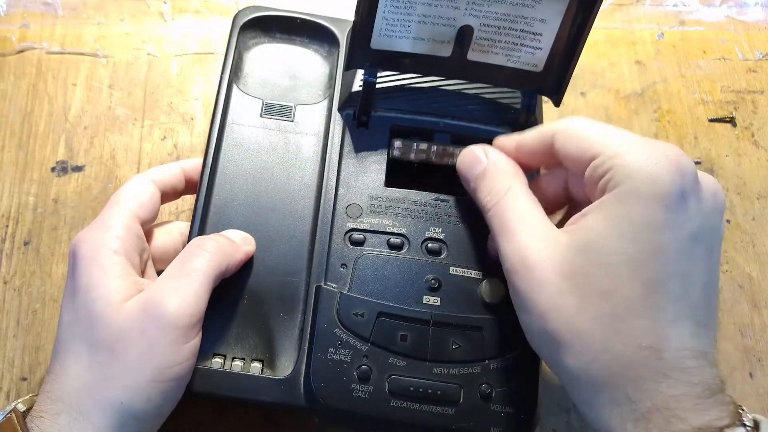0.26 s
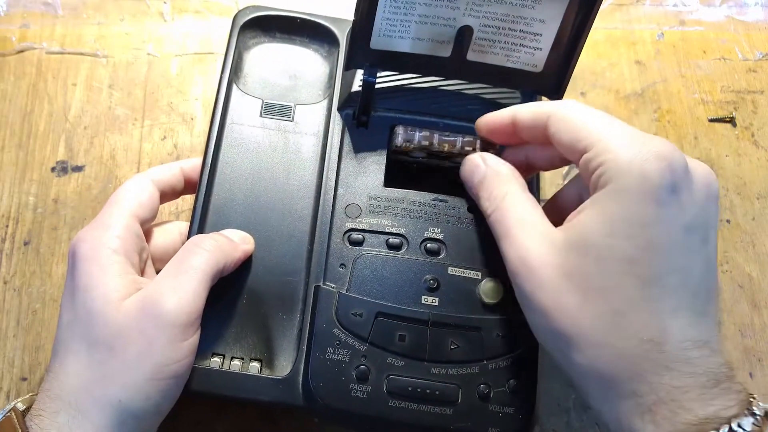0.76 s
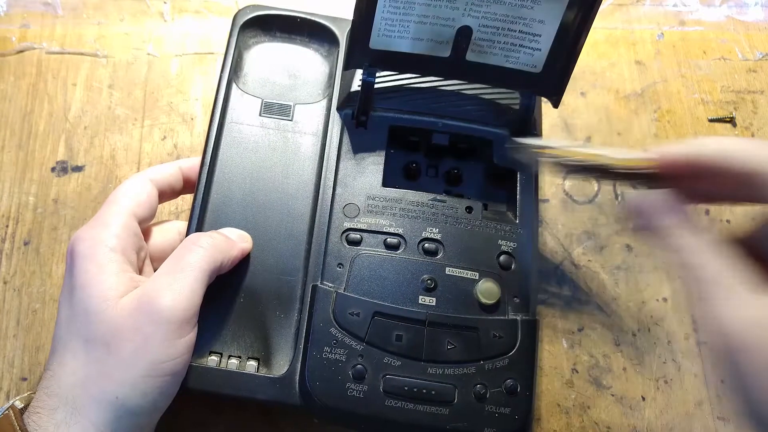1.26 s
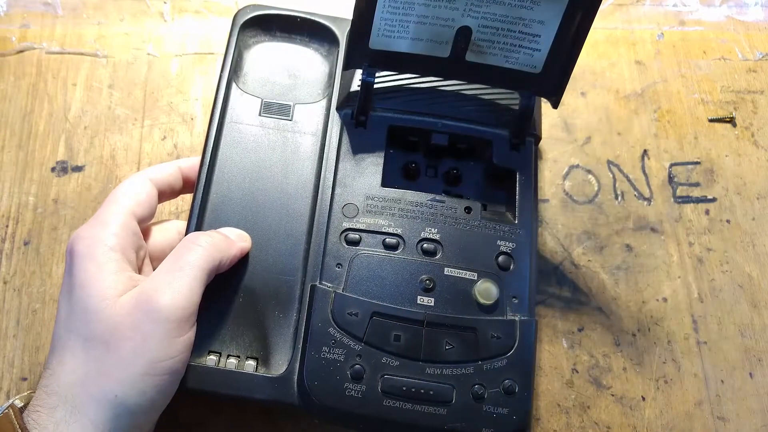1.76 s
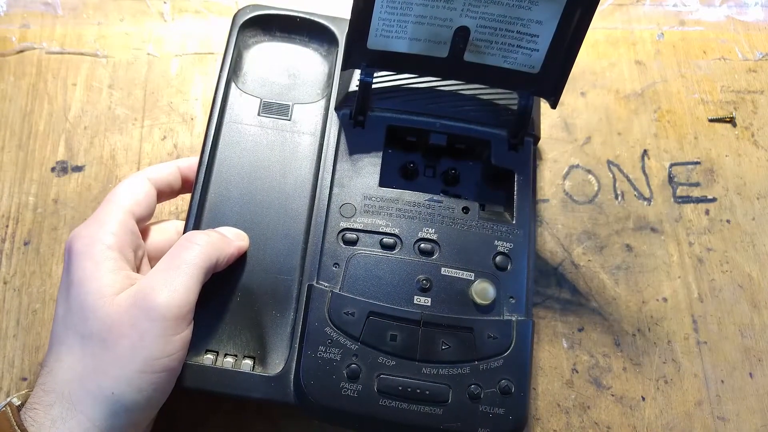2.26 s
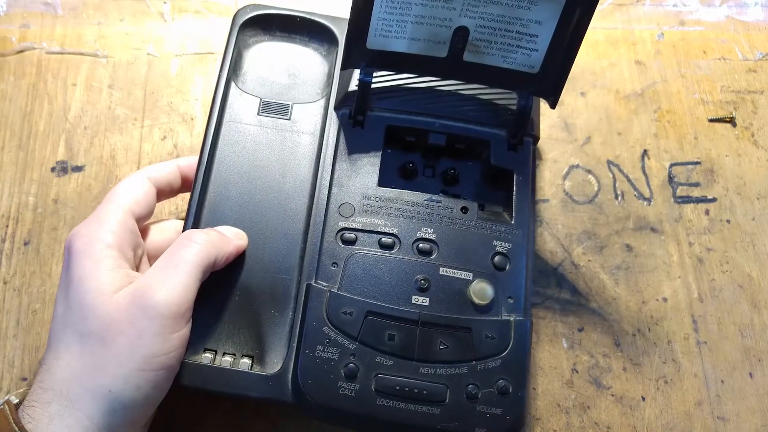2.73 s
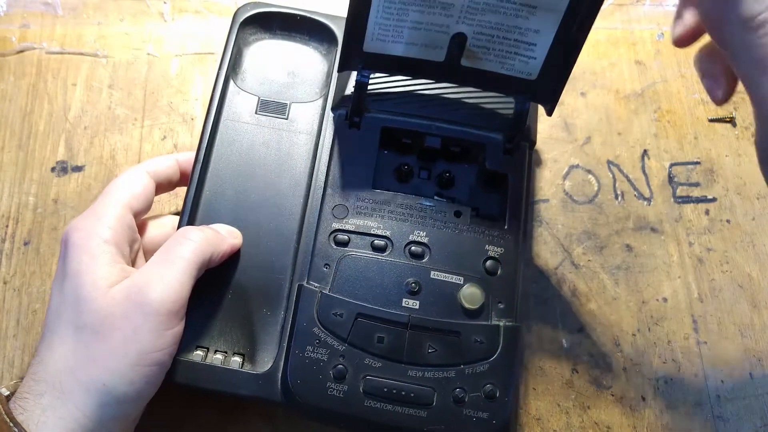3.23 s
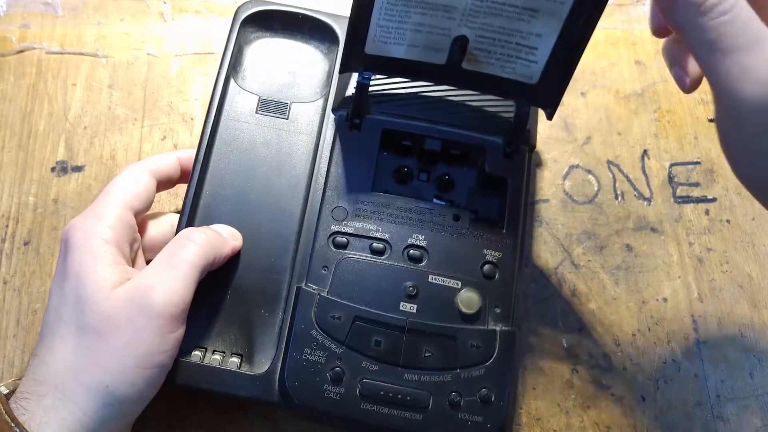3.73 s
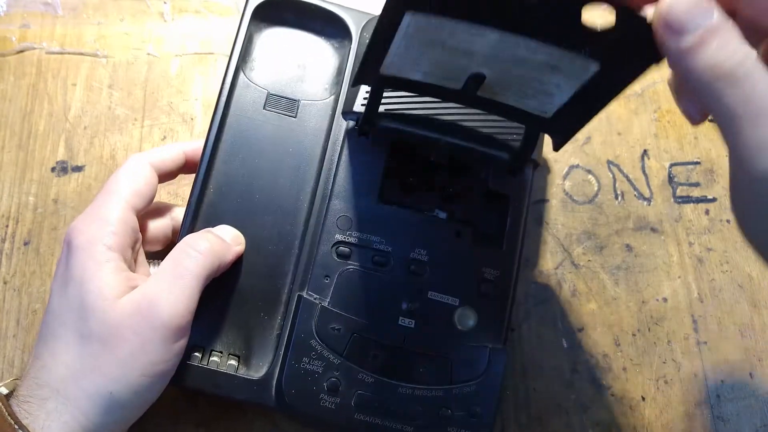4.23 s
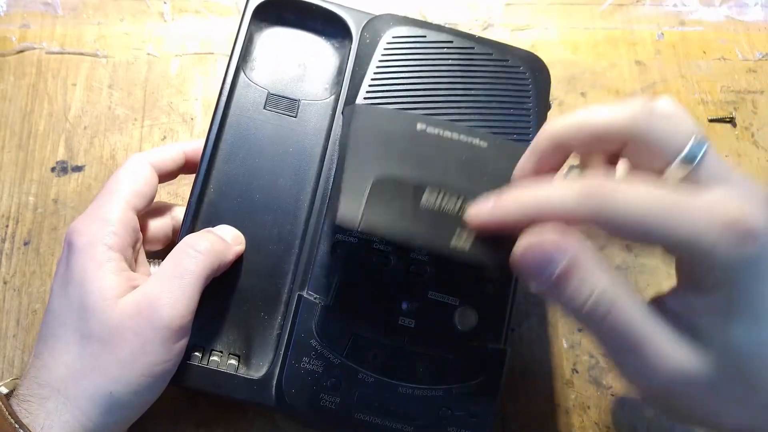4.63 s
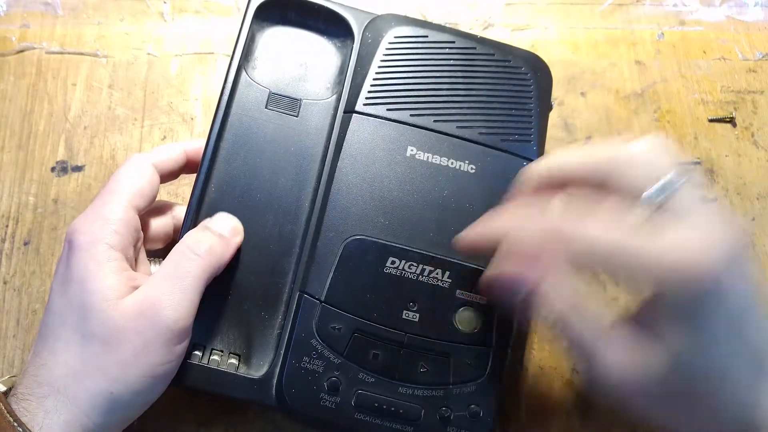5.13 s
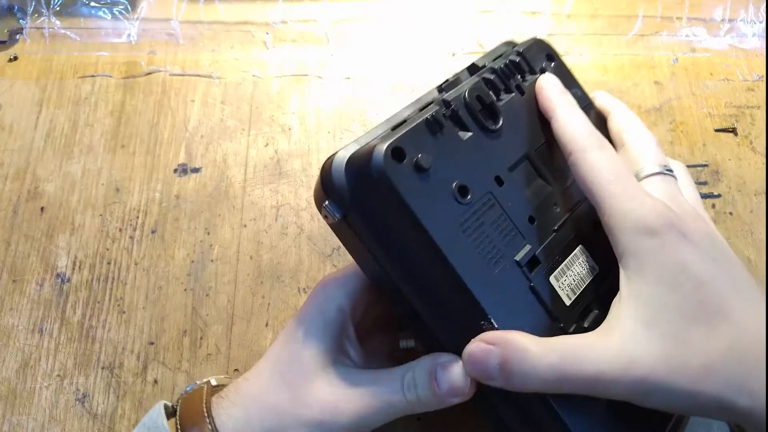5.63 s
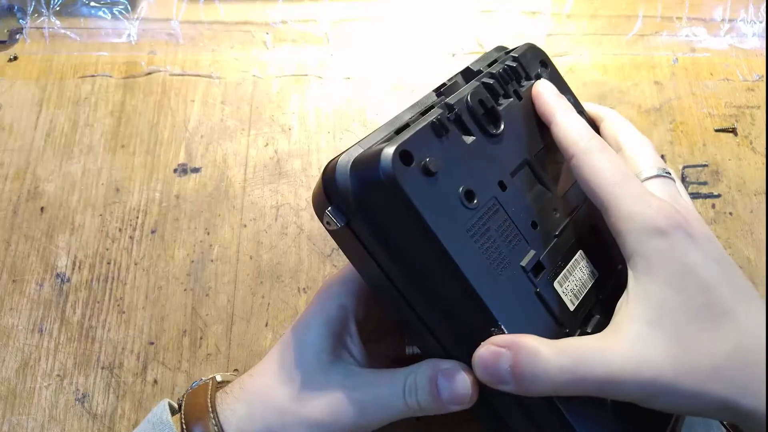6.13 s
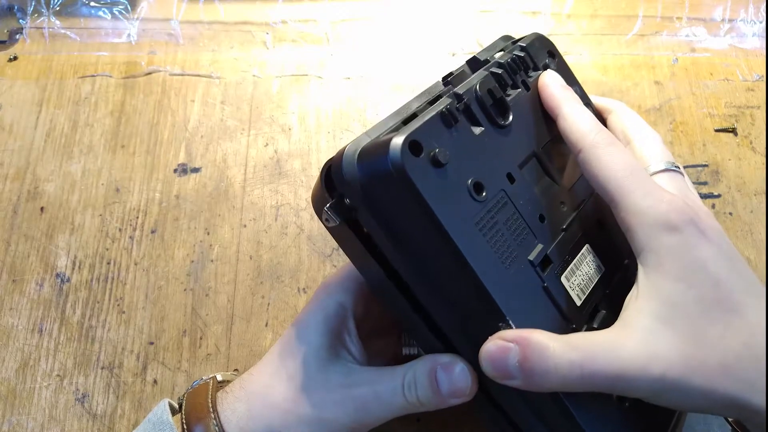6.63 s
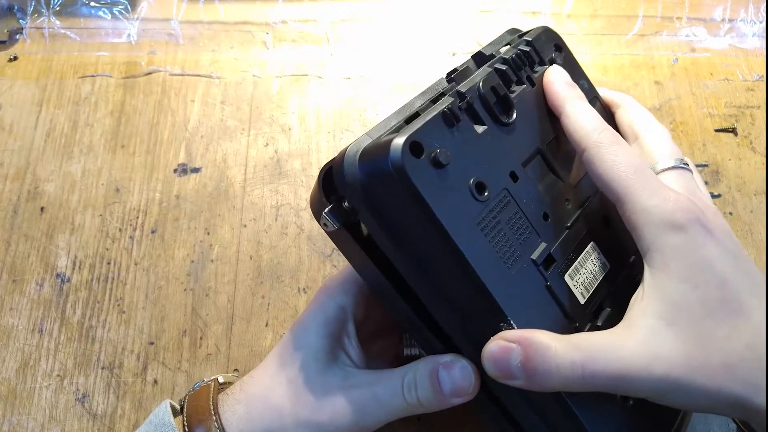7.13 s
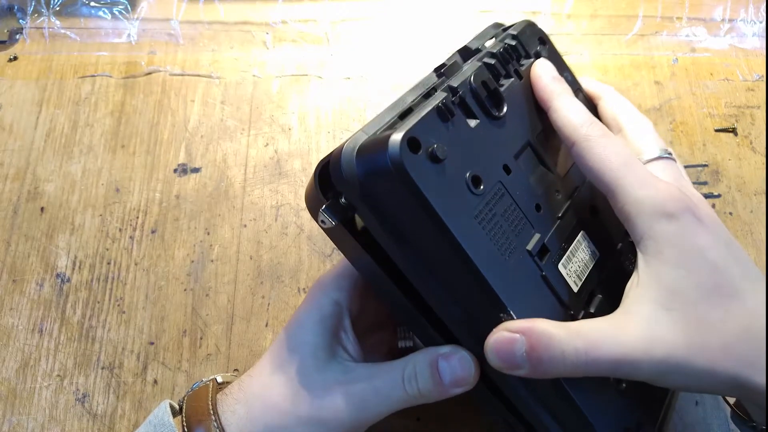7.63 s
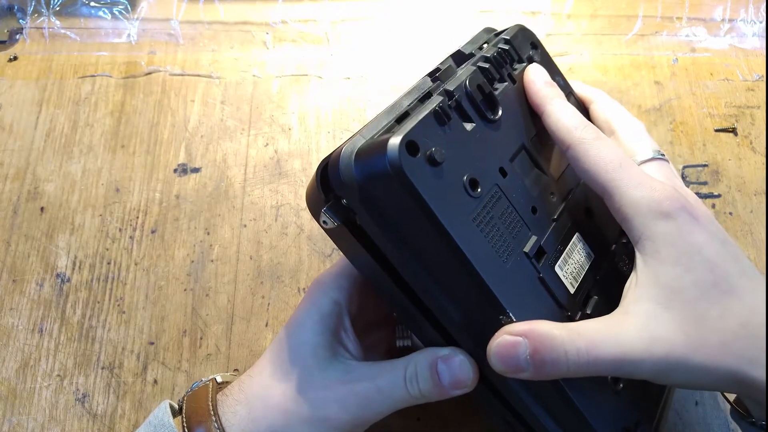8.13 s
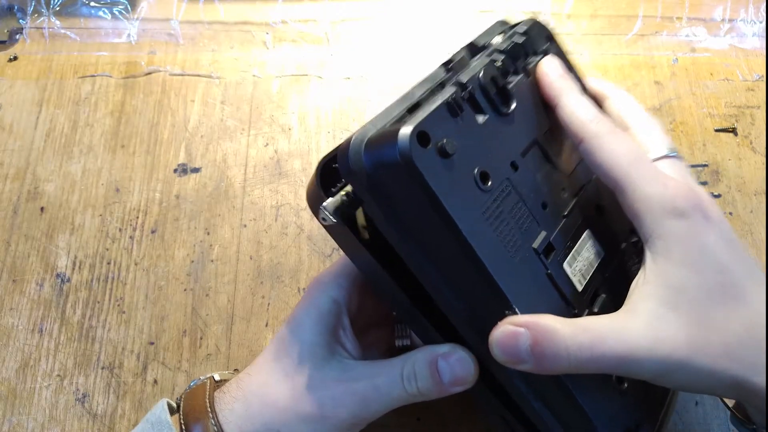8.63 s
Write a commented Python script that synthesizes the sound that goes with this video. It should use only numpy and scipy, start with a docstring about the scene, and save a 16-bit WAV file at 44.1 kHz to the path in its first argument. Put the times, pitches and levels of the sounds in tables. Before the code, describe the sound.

Close plastic clicks and taps as a small cassette snaps out, a hinged lid claps shut, and a hollow case is prised apart.

```python
"""A plastic answering machine is handled on a wooden workbench in a small room, close to the microphone.
First fingers rub and tap the case, and a small cassette is pulled out and put aside with a hissing slide and a snap.
Then the lid comes free, drones on its hinges and snaps shut; last the case is tipped up and prised apart, creaking.
Contacts are filtered noise bursts over damped modes of shell and bench; rubbing is noise that sticks and slips.
Faint steady noise lies under it all, the room adds a tail, and the loudest peaks saturate."""
import sys
import numpy as np
from scipy import signal
from scipy.fft import rfft, irfft
from scipy.io import wavfile

SR = 44100
rng = np.random.default_rng(int(sys.argv[2]) if len(sys.argv) > 2 else 0)


def dump_mix(stems):
    """Bounce the given channels to the path in sys.argv[1] as a 16-bit WAV at rate SR."""
    frames = np.atleast_2d(stems).T  # one column per channel
    limited = np.clip(frames, -1, 1)  # hard clip at full scale
    pcm = np.round(limited * 32767).astype(np.int16)
    wavfile.write(sys.argv[1], SR, pcm)


N = 391166  # length in samples

# Colour of the room's steady noise. Each row: frequency in Hz, relative level in dB.
QUIET = [(20, -12.5), (52, 1.5), (100, -4), (220, -13.5), (1000, -24.5), (4000, -27.5), (7000, -23.5),
         (10000, -27), (15500, -28)]
QUIET_DB = -68.5
# The room's tail. Each row: band centre in Hz, t60 in seconds, level in dB.
ROOM = [(125, 0.95, -9.5), (320, 0.33, -4), (896, 0.1, -12), (2200, 0.29, -6.5), (5445, 0.33, -12),
        (12000, 0.28, -12)]
# Treble difference of the two microphone ports. Each row: frequency in Hz, left minus right in dB.
PORTS = [(100, 0), (600, 0.5), (1200, -2), (2200, 0), (3500, 0), (6800, -4.5), (8500, 1.5), (10500, 5.5),
         (15000, 2)]
TOP_HZ = 16000  # nothing much is heard above this

# Modes of the bench top, detuned a little at each blow. Each row: frequency in Hz, level in dB, t60 in seconds.
BENCH = [(62, -11, 0.3), (87.5, -4, .25), (105.36, 0.5, 0.46), (148, -0.5, 0.17), (178, -6, 0.06),
         (229, -6, 0.1)]
# Modes of the hollow shell, detuned a little at each blow.
# Each row: frequency in Hz, level in dB, t60 in seconds.
SHELL = [(265, -3.5, 0.04), (350, -1, 0.033), (363, -8.5, 0.088), (471.3, -6.5, 0.06), (512, -3.5, 0.091),
         (560, -7.5, 0.022), (610, -5, 0.032), (656, 0.5, 0.075), (704, -8.5, 0.036), (873, -4.5, 0.037),
         (1010, -5, 0.027), (1109, -5.5, 0.087), (1310, -10, 0.04)]
# Modes of the small catch where the cassette goes. Each row: frequency in Hz, level in dB, t60 in seconds.
CATCH = [(185, 5, 0.14), (238.9, 2, 0.044), (484, -1, .07), (745, 5, 0.058), (810, 0, 0.026)]
# Modes of the closed lid. Each row: frequency in Hz, level in dB, t60 in seconds.
LID = [(203, -16.5, 0.092), (362, -14, 0.083), (399, -13, 0.13), (495, -7, 0.096), (540, -3.5, 0.027),
       (565, -1, 0.09), (648, -6, .07), (1026, -5, 0.08), (1215, -12, 0.076)]
# Modes of the loose parts. Each row: frequency in Hz, level in dB, t60 in seconds.
RATTLE = [(5768, -8, 0.05), (6383, -3.5, 0.06), (6645, -2, 0.06), (7000, -1, 0.06), (7100, 1, 0.057),
          (7200, 0, 0.08), (7356, -1, 0.07), (7600, -5.5, 0.05), (7850, -4, 0.05), (8744, -8.5, 0.05),
          (9900, -8, 0.04)]
BODY_LOW_HZ = 170  # below this the plastic bodies radiate little

# Resonances of the case's thin plastic walls. Each row: frequency in Hz, width in Hz, boost in dB.
WALLS = [(1033, 45, 2), (1190, 120, 2.5), (1670, 78, 2.5), (2070, 62, 2.5), (2490, 46, 5.5),
         (2630, 30, 3.5), (3110, 37, 4.5), (3500, 340, 2.5), (4650, 5.2, 9), (5500, 50, 5), (6240, 98, 5.5),
         (6650, 120, 3), (6840, 86, 6.5), (7400, 99, 0.5), (7450, 190, 4.5), (8110, 180, 8),
         (8910, 120, 4.5), (9800, 190, 6), (12800, 250, 4.5)]
# Wall resonances of the small catch. Each row: frequency in Hz, width in Hz, boost in dB.
CATCH_WALLS = [(2400, 60, 4), (3254, 70, 7), (5250, 70, 8), (6460, 55, 4.7), (6570, 60, 7), (6853, 90, 3.4),
               (7050, 45, 8), (6910, 50, 6.8), (7210, 55, 9), (7635, 70, 5.6), (8630, 200, 11),
               (9605, 150, 7), (10100, 140, 6.3)]
# Wall resonances of the lid. Each row: frequency in Hz, width in Hz, boost in dB.
LID_WALLS = [(1045, 50, 3.6), (2140, 120, 4), (2397, 50, 8), (4406, 40, 3.4), (5990, 60, 7), (6580, 70, 8),
             (7130, 45, 5), (7920, 69, 10), (8240, 110, 13), (12200, 250, 14)]

# Clack of the case, its dense wall modes. Each row: frequency in Hz, relative level in dB.
CLACK = [(500, -19), (850, 1.5), (1100, 0.5), (1400, -1), (1800, -0.5), (2400, -2), (3200, -5.5),
         (4400, -5.5), (6000, -12.5)]
# Clack of the small catch, higher than the case. Each row: frequency in Hz, relative level in dB.
CATCH_CLACK = [(500, -14), (850, -3.5), (1300, -11.5), (2000, -3.5), (2800, -5), (3600, 1.5), (4800, -1),
               (6500, -13)]
# Clack of the shut lid, lower and hollower than the case. Each row: frequency in Hz, relative level in dB.
LID_CLACK = [(450, -12.5), (800, -2.5), (1030, 3), (1300, -4.5), (1800, -2.5), (2400, -4.5), (3200, -4),
             (4400, -2), (6000, -12)]
# Dull knock of a soft bump. Each row: frequency in Hz, relative level in dB.
KNOCK = [(380, -10.5), (600, 1), (900, 0.5), (1300, -3.5), (2000, -10), (3000, -19), (6000, -29)]
# Tick of a sharp edge contact. Each row: frequency in Hz, relative level in dB.
TICK = [(3000, -34), (4600, -11.5), (5800, -3), (6500, -2.5), (7200, 1.5), (8200, -7.5), (9500, -10),
        (12000, -17), (15500, -20.5)]
# Tick of the small catch. Each row: frequency in Hz, relative level in dB.
CATCH_TICK = [(3000, -30.5), (4800, -12.5), (6000, -5), (6900, 0.5), (7700, -3.5), (8600, -6.5),
              (9200, -11.5), (10300, -12), (12000, -20), (15500, -22.5)]

# Friction colour of rumble in the bench. Each row: frequency in Hz, relative level in dB.
RUMBLE = [(25, -14), (60, 2.5), (100, 6.5), (150, -0.5), (250, -8.5), (400, -23.5), (700, -38)]
# Friction colour of a dull rub on the shell. Each row: frequency in Hz, relative level in dB.
RUB = [(200, -16), (350, -3.5), (520, -1), (660, -1.5), (850, -5), (1200, -7.5), (2000, -21), (4000, -39.5)]
# Friction colour of a dry scrape. Each row: frequency in Hz, relative level in dB.
SCRAPE = [(700, -19), (1500, -4), (2300, -2.5), (4000, -5), (5500, -3.5), (7000, 4), (8500, -8),
          (11000, -15), (15500, -15.5)]
# Friction colour of a smooth hiss. Each row: frequency in Hz, relative level in dB.
HISS = [(700, -24.5), (1800, -11.5), (3000, -16), (5000, -11), (7000, -1), (9000, -8.5), (12000, -11),
        (15500, -15.5)]
# Friction colour of the hinges' drone in the shell. Each row: frequency in Hz, relative level in dB.
DRONE = [(300, -24), (560, -6), (630, 7), (690, 5), (770, -16), (1100, -19), (2000, -34)]
# Friction colour of soft rustling. Each row: frequency in Hz, relative level in dB.
RUSTLE = [(300, -14), (480, 2.5), (650, -4), (880, 4), (1300, -6.5), (1900, -16.5), (4000, -17)]

# The bench rumbles under shifting hands, and thumps as the lid comes free.
# Each row: start in seconds, length in seconds, level in dB.
BENCH_RUMBLES = [(0.0, 0.098, -55), (0.422, 0.36, -62.5), (0.616, 0.086, -58), (1.03, 0.32, -68.5),
                 (2.867, 0.37, -56.5), (3.186, 0.68, -55.5), (3.556, 0.27, -61), (3.989, 0.075, -43.5),
                 (5.049, 0.36, -52), (5.322, 0.26, -63), (5.863, 0.089, -67), (6.109, 0.14, -52.5),
                 (6.585, 0.22, -52.5), (8.243, 0.59, -71.5), (8.58, 0.24, -66)]
BENCH_RUMBLE_ATTACK_S = 0.0046
# Soft rustles. Each row: start in seconds, length in seconds, level in dB.
RUSTLES = [(0.5, 0.15, -59), (0.65, 0.11, -67.5), (0.76, 0.19, -71), (7.2, 0.23, -79), (7.44, 0.13, -72),
           (7.63, 0.059, -67.5), (7.75, 0.13, -67), (7.92, 0.07, -71)]
# Short strokes of a finger or an edge over the plastic.
# Each row: start in seconds, length in seconds, dry scrape in dB, shell rub in dB.
SCUFFS = [(0.0, 0.078, -50, -58), (0.149, 0.13, -61, -70), (0.427, 0.12, -57, -57), (0.953, 0.17, -49, -67),
          (2.377, 0.083, -45.5, -53.5), (2.486, 0.056, -45.5, -54), (2.533, 0.018, -29, -58),
          (2.973, 0.15, -64.5, -94), (3.285, 0.062, -61, -49), (3.327, 0.17, -63, -56),
          (3.619, 0.13, -71, -74), (3.802, 0.4, -69, -78), (4.902, 0.16, -34, -39.5),
          (5.544, 0.052, -56, -52), (5.676, 0.12, -60, -56), (5.891, 0.07, -61.5, -63),
          (6.375, 0.032, -73.5, -55), (6.498, 0.082, -46, -48.5), (6.568, 0.018, -44, -36.5),
          (6.884, 0.11, -58, -74), (7.899, 0.12, -60.5, -74), (8.191, 0.12, -58, -72),
          (8.57, 0.05, -62, -59), (8.666, 0.29, -55, -69.5)]
STROKE_SKEW = 0.72  # below 1 a stroke peaks before its middle

# Hollow hums in the plastic, mostly gliding; the one at 4.006 s is the bench booming under the freed lid.
# Each row: start in seconds, length in seconds, level in dB, first pitch in Hz, last pitch in Hz.
HUMS = [(1.6, 0.6, -59, 368.5, 392), (1.905, 0.08, -60, 272.5, 234), (1.95, 0.56, -59, 401, 380),
        (2.865, 0.16, -66, 245, 200), (3.33, 0.23, -64.5, 368, 330), (3.62, 0.28, -67, 385, 350),
        (4.006, 0.07, -43, 100, 100), (4.26, 0.21, -65, 260.4, 195), (5.05, 0.16, -53, 278.8, 201.2),
        (5.845, 0.13, -59.5, 206.6, 180), (6.025, 0.15, -61.5, 397, 390), (6.16, 0.38, -67.5, 385, 410)]
# Resonances of the hum. Each row: multiple of its pitch, width in Hz, level in dB.
HUM_MODES = [(1, 91, -1), (2.27, 99, -20.5), (5.05, 224.4, -22)]
# Plastic edges squeak under strain.
# Each row: start in seconds, length in seconds, level in dB, first pitch in Hz, last pitch in Hz.
SQUEAKS = [(0.152, 0.046, -68, 2010, 2040), (7.55, 0.3, -72.5, 2950, 3020), (8.69, 0.088, -66, 2615, 2530)]
# Resonances of a squeak. Each row: multiple of its pitch, width in Hz, level in dB.
SQUEAK_MODES = [(1.001, 104, 3.5), (2.067, 120, -5)]

# The cassette is pushed ever harder towards its catch, and its hiss grows until the snap.
SLIDE_START_S, SLIDE_ATTACK_S, SLIDE_DB, SLIDE_RISE_DB_PER_S = 1.78, 0.24, -63.5, 12
# Level curves of the lid swinging on its hinges, before the trims.
# Each row: time in seconds, bench rumble in dB, hinge drone in dB, friction hiss in dB.
HINGE = [(4.08, -51.5, -53, -69), (4.17, -65, -65.5, -74), (4.24, -57.5, -70, -68), (4.321, -54, -66, -71),
         (4.46, -58.5, -60, -53), (4.6, -66, -64, -54.5), (4.78, -76, -64.5, -62.5), (4.9, -67, -58, -54)]
RUMBLE_TRIM_DB, DRONE_TRIM_DB, HISS_TRIM_DB = -0.5, -0.5, 2.0

# The case creaks and scrapes in runs of small slips.
# Each row: start in seconds, length in seconds, shell in dB, wall crackle in dB, shell centre in Hz.
CREAKS = [(5.3, 0.07, -49.5, -72.5, 560), (5.35, 0.17, -56, -65, 554), (5.585, 0.028, -62, -69, 603),
          (5.712, 0.14, -59, -78, 600), (5.911, 0.092, -62, -67, 600), (6.514, 0.038, -51, -56.5, 584),
          (6.57, 0.1, -49.5, -51, 760), (6.682, 0.03, -51, -45, 700), (8.765, 0.11, -52.5, -51, 710)]
CREAK_SLIPS_HZ, CREAK_FOCUS_DB = 152.4, 15.5  # mean slip rate; loss one octave off centre

# Soft bumps: fingers and parts on the shell, and the cassette knocking as it is put aside.
# Each row: start in seconds, shell in dB, dull knock in dB, shell centre in Hz.
BUMPS = [(0.4097, -60.5, -71, 645), (0.5857, -57, -53, 805), (0.668, -63, -76, 650),
         (0.7415, -62, -61.5, 704), (2.576, -45, -52, 249), (2.609, -51, -49.5, 484),
         (2.8713, -58, -74, 280.7), (3.2304, -53.5, -66, 580), (4.903, -40, -50, 600),
         (4.921, -34, -38, 584), (4.957, -35, -37, 560), (5.057, -40, -44, 600), (5.273, -57.5, -69, 657),
         (5.2964, -48.5, -63, 590), (5.3209, -46.5, -58, 536), (5.5296, -40, -53.5, 640),
         (5.5817, -46, -54, 670), (5.6, -48, -56, 623), (5.678, -44.5, -50.5, 618),
         (5.7416, -44.5, -55.5, 619), (5.9758, -52.5, -59, 662), (6.49, -46, -45, 521),
         (6.8755, -57, -52, 700), (8.076, -58.5, -62, 680), (8.582, -60.5, -57.5, 651),
         (8.657, -63.5, -64, 648), (8.713, -60, -62.5, 755), (8.749, -57, -62, 640), (8.786, -44, -45, 382)]
BUMP_TICK_DB, BUMP_T60_S, BUMP_RISE_S = -19.5, 0.055, 0.0025  # tick relative to the shell
# Plastic clicks on plastic; clack and tick are levels before the trims.
# Each row: start in seconds, clack in dB, tick in dB, shell in dB, shell centre in Hz, plastic ring t60 in seconds.
TAPS = [(0.199, -50, -46, -65, 931, 0.25), (0.481, -26.5, -32, -44.5, 730, 0.036),
        (0.6731, -70, -51, -69, 700, 0.63), (1.032, -28.5, -33, -46, 600, 0.12),
        (1.0598, -31, -39, -45.5, 594, 0.031), (1.066, -30.5, -53, -45.5, 640, 0.028),
        (2.2768, -25.5, -21, -46.5, 366, 0.078), (2.3697, -29, -28.5, -48, 240, 0.054),
        (2.4104, -38.5, -49, -57, 500, 0.042), (2.4717, -40.5, -42.5, -61, 800, 0.076),
        (3.18, -54, -51.5, -60.5, 652, 0.4), (3.313, -23.5, -27.5, -37, 681, 0.04),
        (3.321, -25.5, -41, -38, 640, 0.03), (3.561, -57, -54, -62, 396, 0.087),
        (5.036, -32, -52, -63, 524, 0.032), (5.135, -35, -41.5, -46.5, 528, 0.082),
        (5.3465, -35, -39, -40, 649, 0.054), (5.3666, -37, -37, -38.5, 607, 0.021),
        (5.389, -31.5, -34, -36, 540, 0.022), (5.4116, -27, -35, -37, 500, 0.037),
        (5.418, -33, -35, -45.5, 523, 0.022), (5.449, -25.5, -28.5, -36.5, 557, 0.049),
        (5.459, -41, -53, -43.5, 560, 0.025), (5.4846, -30, -40.5, -40.5, 570, 0.048),
        (5.7605, -46.5, -55, -57, 660, 0.04), (6.1051, -42, -38.5, -44.5, 346, 0.09),
        (6.144, -42, -43, -47, 477, 0.14), (6.5814, -22, -35, -37, 670, 0.04),
        (6.5878, -31, -35, -46, 675, 0.2), (6.6218, -21.5, -49, -32, 1053, 0.043),
        (6.6313, -44, -36, -60, 657, 0.033), (6.6775, -41, -39.5, -41, 696, 0.04),
        (6.6855, -28.5, -34, -52, 500, 0.034), (6.692, -27.5, -35.5, -45.5, 488, 0.045),
        (6.773, -51.5, -46.5, -65, 891, .05), (8.2, -50.5, -68, -80, 900, 0.11),
        (8.65, -50.5, -53, -65, 662, 0.13), (8.7691, -37, -50, -51, 675, 0.27),
        (8.7959, -37.5, -48, -34.5, 587, 0.15), (8.825, -34, -39.5, -62, 476, 0.16),
        (8.8375, -28.5, -37, -64, 476, 0.035), (8.8513, -29.5, -30.5, -51, 350, 0.06)]
TAP_CLACK_TRIM_DB, TAP_TICK_TRIM_DB = -9.0, -3.0
# A tap cracks once and its rebounds fall quickly:
# crack over ring, share kept by each rebound, depth of the ripple in its colour.
TAP_CRACK, TAP_REBOUND, TAP_RAGGED_DB = 0.9, 0.55, 2.2
# The bench's share of each blow relative to the shell; less once the case is lifted in the hands.
TAP_BENCH_DB, BUMP_BENCH_DB = -19.5, -20
LIFT_S, LIFT_DB = 5.52, -10

# Loose parts buzz on after a hard snap. Each row: start in seconds, level in dB, t60 in seconds.
RATTLES = [(2.555, -31.5, 0.2), (4.951, -32.5, 0.19)]
RATTLE_HITS_HZ = 95.5  # mean rate
# Three snaps: cassette put away, lid freed, lid shut. Each row: start in seconds, clack in dB, tick in dB,
# shell in dB, bench in dB, shell centre in Hz, plastic ring t60 in seconds.
SNAPS = [(2.5417, -12.5, 0, -26, -72, 530, 0.013), (4.0004, -29.5, -31, -28.5, -38, 524, 0.079),
         (4.9332, -8, -2.5, -13.5, -42.5, 600, .044)]

# The level of everything but the steady noise dips briefly.
DIP_FROM_S, DIP_TO_S, DIP_DB = 5.512, 5.529, -19


def undb(db):
    """Decibels to gain."""
    return 10 ** (np.asarray(db) / 20)


def unit(x):
    """Scale to rms 1."""
    return x / np.sqrt(np.mean(x ** 2))


def decay(t, t60):
    """Exponential fade that loses 60 dB in t60 seconds."""
    return np.exp(-np.log(1000) * t / t60)


def add(track, s, sound):
    """Mix a sound in at time s."""
    i = max(int(s * SR), 0)
    track[:, i:i + sound.shape[-1]] += sound[..., :N - i]


def swell(s, db):
    """Gain along a level curve, silent outside it."""
    return undb(np.interp(np.arange(N) / SR, s, db, left=-140, right=-140))


def response(points, size=4096):
    """Gain of a (Hz, dB) shape on an even frequency grid."""
    hz, db = np.transpose(points)
    grid = np.maximum(np.arange(size // 2 + 1) * SR / size, 1)
    return undb(np.interp(np.log(grid), np.log(hz), db)), grid


def colour(x, points, size=4096, peaks=()):
    """Causal filter of unit power: a (Hz, dB) shape that falls away beyond its ends, with resonances on top."""
    gain, grid = response(points, size=size)
    gain = gain * np.minimum(grid / points[0][0], 1) ** 2 * np.minimum(points[-1][0] / grid, 1) ** 2
    for hz, width_hz, db in peaks:
        gain = gain * undb(db / (1 + (2 * (grid - hz) / width_hz) ** 2))
    # folding the cepstrum gives minimum phase, so nothing sounds ahead of a blow
    cepstrum = irfft(np.log(gain + 1e-6))
    cepstrum[1:size // 2] *= 2
    cepstrum[size // 2 + 1:] = 0
    h = irfft(np.exp(rfft(cepstrum)))
    return signal.oaconvolve(x, h[None] / np.linalg.norm(h), axes=1)[:, :x.shape[1]]


def noise(count, alike):
    """Stereo noise whose channels share a part of their power."""
    common, own = rng.standard_normal(count), rng.standard_normal((2, count))
    alike = np.clip(alike, 0, 1)
    return np.sqrt(alike) * common + np.sqrt(1 - alike) * own


def room_noise():
    """The room's faint steady noise is coloured noise, partly alike at both ports."""
    return undb(QUIET_DB) * unit(colour(noise(N, 0.26), QUIET))


def room(x, gap_s=0.0027, build_s=0.005):
    """Diffuse reflections build up after a short gap and die band by band; the bass is more alike at both ports."""
    t = np.arange(SR * 2 // 3) / SR
    log_centres = np.log(np.array(ROOM)[:, 0])
    grid = np.log(np.maximum(np.fft.rfftfreq(len(t), 1 / SR), 1))
    tail = 0
    for (centre, t60, db), share in zip(ROOM, np.eye(len(ROOM))):
        fade = (1 - np.exp(-np.maximum(t - gap_s, 0) / build_s)) * decay(t, t60)
        band = np.sqrt(np.interp(grid, log_centres, share))
        alike = 1 / (1 + (centre / 500) ** 2)
        wash = irfft(rfft(noise(len(t), alike)) * band, len(t))
        tail = tail + undb(db) * wash * fade / np.linalg.norm(fade)
    return signal.fftconvolve(x, tail, axes=1)[:, :N]


def friction(points, alike, rough_db, slip_hz):
    """Surfaces stick and slip: noise whose strength jumps with every slip, coloured by the walls."""
    slips = np.cumsum(rng.random(N) < slip_hz / SR)
    grip = undb(rough_db * rng.standard_normal(N))[slips]
    return unit(colour(noise(N, alike) * grip, points, peaks=WALLS))


def cut(x, s, length):
    """Take the stretch of a friction noise that starts at time s."""
    return x[:, int(s * SR):int((s + length) * SR)]


def stroke_arch(count):
    """A stroke bites quickly and eases off."""
    return np.sin(np.pi * np.linspace(0, 1, count) ** STROKE_SKEW)


def bench_rumbles():
    """The bench rumbles under shifting hands and thumps under the freed lid: a quick rise, then an even fall."""
    out = np.zeros((2, N))
    rumble = friction(RUMBLE, 0.85, rough_db=3, slip_hz=30)
    for s, length, db in BENCH_RUMBLES:
        low = undb(db) * cut(rumble, s, length)
        t = np.arange(low.shape[1]) / SR
        add(out, s, low * np.minimum(t / BENCH_RUMBLE_ATTACK_S, 1) * (1 - t / length))
    return out


def rustles():
    """Soft rustling on the plastic comes as arches of friction noise."""
    out = np.zeros((2, N))
    rustle = friction(RUSTLE, 0.26, rough_db=3, slip_hz=135)
    for s, length, db in RUSTLES:
        stroke = undb(db) * cut(rustle, s, length)
        add(out, s, stroke * stroke_arch(stroke.shape[1]))
    return out


def scuffs():
    """Fingers and case edges stroke the plastic, scraping dry in the treble and rubbing the shell below."""
    out = np.zeros((2, N))
    rub = friction(RUB, 0.16, rough_db=5.0, slip_hz=115.4)
    scrape = friction(SCRAPE, 0.027, rough_db=1.5, slip_hz=395)
    for s, length, scrape_db, rub_db in SCUFFS:
        stroke = undb(scrape_db) * cut(scrape, s, length) + undb(rub_db) * cut(rub, s, length)
        add(out, s, stroke * stroke_arch(stroke.shape[1]))
    return out


def singing(table, modes, alike, attack, release):
    """Noise feeds narrow resonances that follow a pitch line; attack and release are shares of the length."""
    out = np.zeros((2, N))
    for s, length, db, start_hz, end_hz in table:
        along = np.linspace(0, 1, int(length * SR))
        phase = 2 * np.pi * np.cumsum(start_hz + (end_hz - start_hz) * along) / SR
        tone = 0
        for multiple, width_hz, mode_db in modes:
            # slow complex noise, shifted up to the pitch, is a narrow band of noise
            lowpass = signal.butter(2, width_hz / 2, fs=SR, output="sos")
            drive = signal.sosfilt(lowpass, noise(SR, alike) + 1j * noise(SR, alike))
            band = (drive[:, -len(along):] * np.exp(1j * multiple * phase)).real
            tone = tone + undb(mode_db) * unit(band)
        edges = np.minimum(along / attack, 1) * np.minimum((1 - along) / release, 1)
        add(out, s, undb(db) * tone * edges)
    return out


def hums():
    """Low resonances give hollow hums in the plastic, mostly gliding, and one steady boom of the bench."""
    return singing(HUMS, HUM_MODES, alike=0.64, attack=0.32, release=0.27)


def squeaks():
    """Strained plastic edges feed high resonances that die away slowly."""
    return singing(SQUEAKS, SQUEAK_MODES, alike=0.67, attack=0.21, release=0.71)


def cassette_slide():
    """Smooth plastic slides towards its catch: hiss that rises evenly in dB and stops at the snap."""
    hiss = friction(HISS, 0.044, rough_db=1.5, slip_hz=610)
    t = np.arange(N) / SR - SLIDE_START_S
    push = np.clip(t / SLIDE_ATTACK_S, 0, 1) * (t < SNAPS[0][0] - SLIDE_START_S)
    return hiss * push * undb(SLIDE_DB + SLIDE_RISE_DB_PER_S * t)


def lid_swing():
    """The lid turns on its hinges: they drone in the shell, rumble in the bench and hiss."""
    hiss = friction(HISS, 0.044, rough_db=1.5, slip_hz=610)
    drone = friction(DRONE, 0.49, rough_db=5.0, slip_hz=99.0)
    rumble = friction(RUMBLE, 0.94, rough_db=3.5, slip_hz=29.9)
    s, rumble_db, drone_db, hiss_db = np.transpose(HINGE)
    low = rumble * swell(s, rumble_db + RUMBLE_TRIM_DB)
    middle = drone * swell(s, drone_db + DRONE_TRIM_DB)
    return low + middle + hiss * swell(s, hiss_db + HISS_TRIM_DB)


def strike(x, db, window=0.0063):
    """Set the level of a blow over its first moments (window in seconds)."""
    return x * undb(db) / np.sqrt(np.mean(x[:, :int(window * SR)] ** 2))


def favour(modes, centre_hz, focus_db):
    """Grip and place of contact favour the body's modes around one pitch."""
    return [(hz, db - focus_db * np.log2(hz / centre_hz) ** 2, t60) for hz, db, t60 in modes]


def ring(modes, t, scatter_db, spread, rise_s, detune=0.034):
    """Damped modes; each place of contact weights them anew, and the ports hear them slightly apart."""
    hz, db, t60 = np.transpose(modes)[:, :, None]
    size, shift, apart, sign = rng.standard_normal((len(modes), 4)).T[:, :, None]
    fade = np.sign(sign) * undb(db + scatter_db * size) * decay(t, t60)
    phase = 2 * np.pi * hz * (1 + detune * shift) * t
    ports = [(fade * np.sin(phase + side * spread * apart)).sum(axis=0) for side in (-1, 1)]
    return np.array(ports) * (1 - np.exp(-t / rise_s))


def spot(x, depth_db, spacing_hz=170):
    """Each place of contact has its own ragged set of peaks and dips."""
    hz = np.cumsum(spacing_hz * rng.uniform(0.5, 1.5, size=160))
    db = depth_db * rng.standard_normal(len(hz))
    return colour(x, [(0.92, 0.00033)] + list(zip(hz, db)), size=2048)


def chatter(t, t60, alike, crack, bounce_s, rebound):
    """Plastic meets plastic: a crack with its short ring, then ever weaker rebounds at uneven gaps."""
    fade = (decay(t, t60) + crack * np.exp(-t / 0.00076)) * (1 - np.exp(-t / 0.00037))
    starts = np.append(0, np.cumsum(bounce_s * rng.uniform(0.34, 1.5, size=4)))
    power = 0
    for k, s in enumerate(starts):
        bounce = np.pad(fade, (int(s * SR), 0))[:len(t)]
        power = power + (min(rebound, 1) ** k * bounce) ** 2
    return noise(len(t), alike) * np.sqrt(power)


def pulses(rate_hz, scatter_db):
    """Unevenly spaced small contacts of uneven strength, for one second."""
    gaps, sizes = rng.uniform(0.4, 1.6, size=400), rng.standard_normal(400)
    at = (np.cumsum(gaps) / rate_hz * SR).astype(int)
    return np.bincount(at, undb(scatter_db * sizes), minlength=SR)[:SR]


def blows(table, hollow, clack_shape, walls, scatter_db, crack, bounce_s, rebound, pan_db,
          clack_db=0, tick_db=0, rise_s=0.0003, focus_db=11, ragged_db=4.0,
          tick_shape=TICK, detune=0.03, body_s=0.0083):
    """Every blow sounds the walls, the edge, a hollow body too small to radiate bass, and the bench below."""
    clacks, ticks, body, wood = np.zeros((4, 2, N))
    t = np.arange(SR // 4) / SR
    sides = undb(np.array([[pan_db], [-pan_db]]) / 2)
    for s, clack, tick, shell, bench, centre_hz, t60 in table:
        wall = spot(chatter(t, t60, 0.21, crack, bounce_s, rebound), ragged_db)
        add(clacks, s, strike(sides * wall, clack + clack_db))
        edge = spot(chatter(t, 0.83 * t60, 0.081, crack, bounce_s, rebound), ragged_db)
        add(ticks, s, strike(sides * edge, tick + tick_db))
        modes = favour(hollow, centre_hz, focus_db)
        hollow_ring = ring(modes, t, scatter_db=scatter_db, spread=0.21, rise_s=rise_s, detune=detune)
        add(body, s, strike(hollow_ring, shell, window=body_s))
        thump = ring(BENCH, t, scatter_db=scatter_db, spread=0.1, rise_s=0.0027)
        add(wood, s, strike(thump, bench, window=0.011))
    body = signal.sosfilt(signal.butter(2, BODY_LOW_HZ, "high", fs=SR, output="sos"), body)
    return colour(clacks, clack_shape, peaks=walls) + colour(ticks, tick_shape, peaks=walls) + body + wood


def creaks():
    """The seams stick and slip; each slip knocks on the hollow shell and ticks on the walls."""
    body, crackle = np.zeros((2, 2, N))
    t = np.arange(SR // 6) / SR
    for s, length, shell_db, wall_db, centre_hz in CREAKS:
        count = int(length * SR)
        slips = (pulses(CREAK_SLIPS_HZ, scatter_db=5.5)[:count] * np.sqrt(np.hanning(count)))[None]
        modes = favour(SHELL, centre_hz, CREAK_FOCUS_DB)
        knock = ring(modes, t, scatter_db=6.5, spread=0.53, rise_s=0.00037) * np.exp(-t / 0.0083)
        add(body, s, strike(signal.fftconvolve(knock, slips, axes=1), shell_db, window=length))
        grip = signal.fftconvolve(np.exp(-t / 0.0011)[None], slips, axes=1)
        ticking = spot(noise(grip.shape[1], 0.18) * grip, depth_db=7)
        add(crackle, s, strike(ticking, wall_db, window=length))
    return body + colour(crackle, CLACK, peaks=WALLS)


def bench_share(s, shell_db, share_db):
    """Bench level of a blow in dB: a share of the shell's motion, less once the case is lifted."""
    return shell_db + share_db + LIFT_DB * (s > LIFT_S)


def bumps():
    """Soft bumps and cassette knocks ring the shell's modes with a slower onset, a dull knock and a weak tick."""
    soft = [(s, knock, shell + BUMP_TICK_DB, shell, bench_share(s, shell, BUMP_BENCH_DB), hz, BUMP_T60_S)
            for s, shell, knock, hz in BUMPS]
    return blows(soft, SHELL, KNOCK, WALLS, scatter_db=2.0, crack=0.4, bounce_s=0.0022, rebound=0.45,
                 pan_db=0.5, rise_s=BUMP_RISE_S, focus_db=15.5, ragged_db=2.5)


def taps():
    """Hard plastic contacts crack, rebound and ring the same shell."""
    hard = [(s, clack, tick, shell, bench_share(s, shell, TAP_BENCH_DB), hz, t60)
            for s, clack, tick, shell, hz, t60 in TAPS]
    return blows(hard, SHELL, CLACK, WALLS, scatter_db=3.5, crack=TAP_CRACK, bounce_s=0.0031,
                 rebound=TAP_REBOUND, pan_db=0.6, clack_db=TAP_CLACK_TRIM_DB, tick_db=TAP_TICK_TRIM_DB,
                 rise_s=0.00076, ragged_db=TAP_RAGGED_DB)


def rattles():
    """Loose parts jump after a snap and tick ever more weakly."""
    out = np.zeros((2, N))
    t = np.arange(SR) / SR
    for s, db, t60 in RATTLES:
        hits = pulses(RATTLE_HITS_HZ, scatter_db=4.5) * decay(t, t60)
        part = ring(RATTLE, t[:SR // 10], scatter_db=2.5, spread=0.6, rise_s=0.0002, detune=0)
        add(out, s, strike(signal.fftconvolve(part, hits[None], axes=1), db, window=0.04))
    return out


def lid_freed():
    """The lid comes free with a softer snap that rings the shell around one pitch."""
    return blows(SNAPS[1:2], SHELL, CLACK, WALLS, scatter_db=-2.0, crack=0.39, bounce_s=0.0031, rebound=0.38,
                 pan_db=0.5, rise_s=0.0015, focus_db=20, ragged_db=2.5)


def cassette_catch():
    """The cassette's small catch snaps: a bright tick and strong rebounds over its own modes."""
    return blows(SNAPS[:1], CATCH, CATCH_CLACK, CATCH_WALLS, scatter_db=0.0, crack=0.89, bounce_s=0.0026,
                 rebound=0.84, pan_db=0.1, ragged_db=0.2, tick_shape=CATCH_TICK, detune=0, focus_db=5)


def lid_shut():
    """The lid falls shut: a low, hollow clack over the modes of the closed lid."""
    return blows(SNAPS[2:], LID, LID_CLACK, LID_WALLS, scatter_db=-0.2, crack=0.4, bounce_s=0.0019, rebound=0.71,
                 pan_db=-1.0, focus_db=4, ragged_db=-0.5, detune=0, body_s=0.02)


def scene():
    """Taps, snaps and rubbing in the room, over its faint steady noise."""
    rubbing = bench_rumbles() + rustles() + scuffs() + hums() + squeaks() + cassette_slide() + lid_swing()
    soft = rubbing + creaks() + bumps() + taps() + lid_freed()
    catch, shut = cassette_catch(), lid_shut()
    # the two hard snaps feed the room a little less
    tail = room(soft + undb(-2.0) * catch + undb(-6.5) * shut)
    heard = soft + catch + shut + rattles() + tail
    t = np.arange(N) / SR
    dip = undb(DIP_DB * ((t > DIP_FROM_S) & (t < DIP_TO_S)))
    return heard * dip + room_noise()


def record(dry, ceiling=0.75):
    """Each port colours the treble, the loudest peaks saturate, and the top is cut."""
    tilt, grid = response(PORTS)
    # half the difference goes to each port
    tilt = np.sqrt(np.interp(np.fft.rfftfreq(N, 1 / SR), grid, tilt))
    heard = irfft(rfft(dry) * np.array([tilt, 1 / tilt]), N)
    saturated = ceiling * np.tanh(heard / ceiling)
    return signal.sosfilt(signal.ellip(8, 0.2, 70, TOP_HZ, fs=SR, output="sos"), saturated)


dry = scene()
out = record(dry)
dump_mix(out)
```